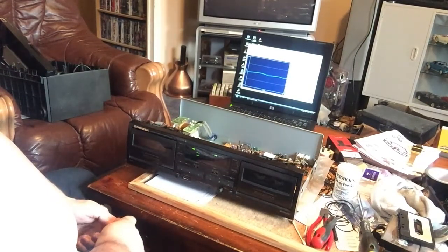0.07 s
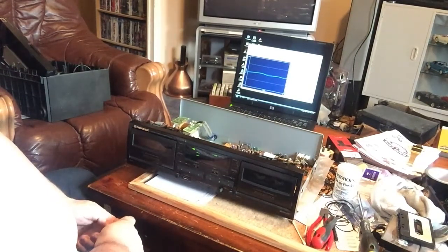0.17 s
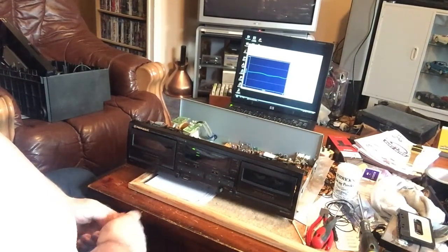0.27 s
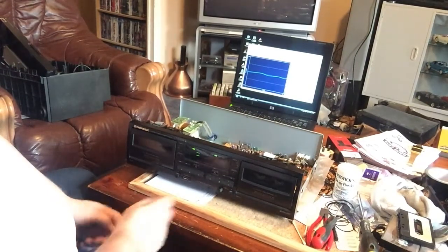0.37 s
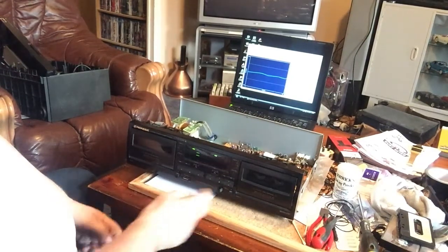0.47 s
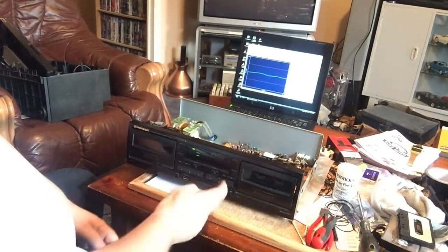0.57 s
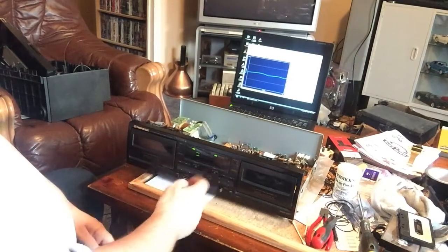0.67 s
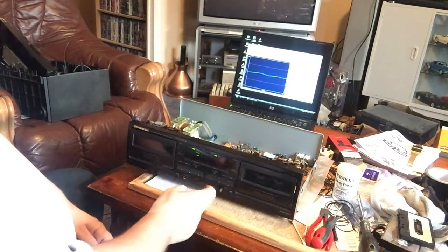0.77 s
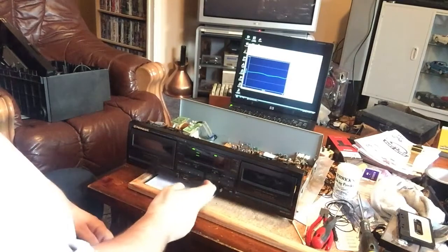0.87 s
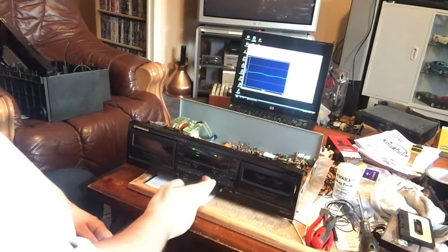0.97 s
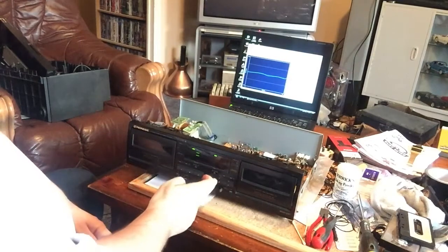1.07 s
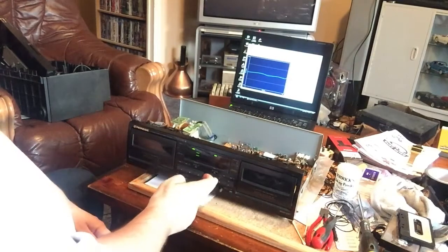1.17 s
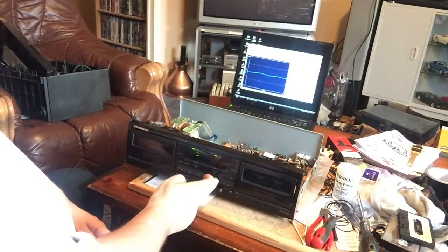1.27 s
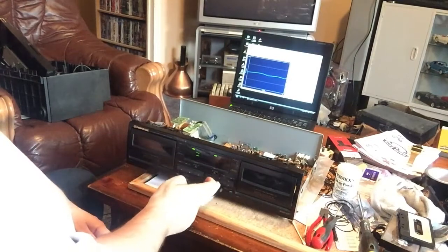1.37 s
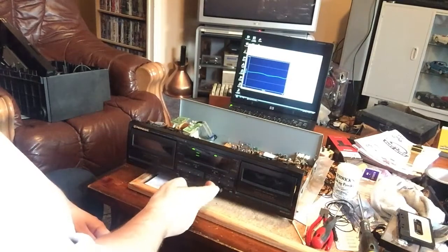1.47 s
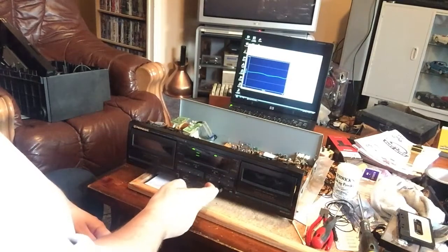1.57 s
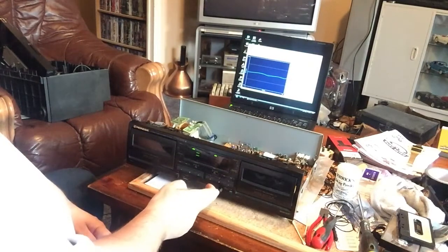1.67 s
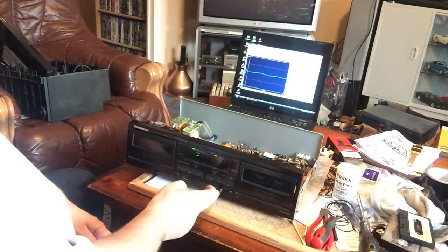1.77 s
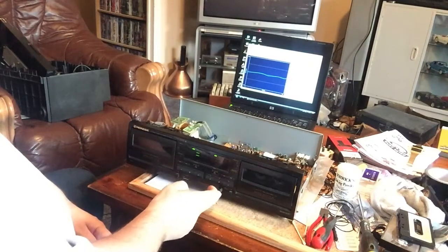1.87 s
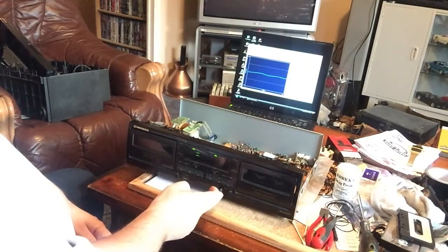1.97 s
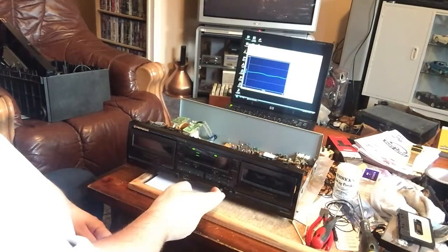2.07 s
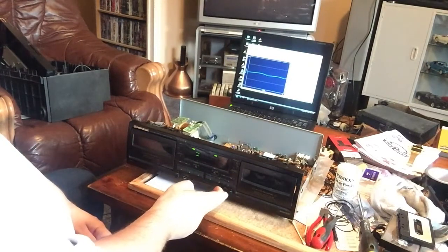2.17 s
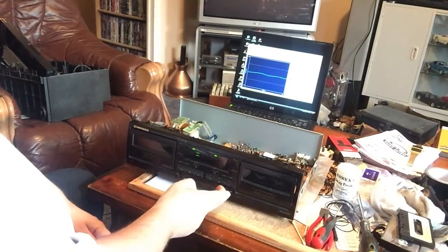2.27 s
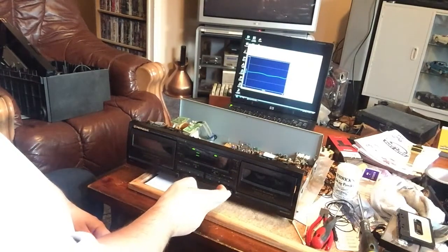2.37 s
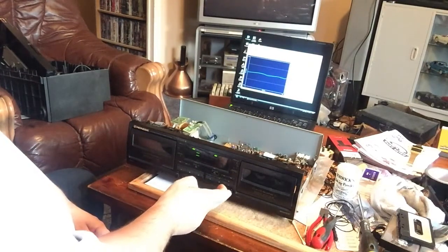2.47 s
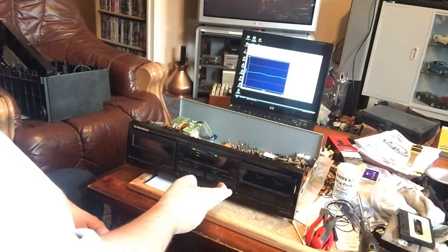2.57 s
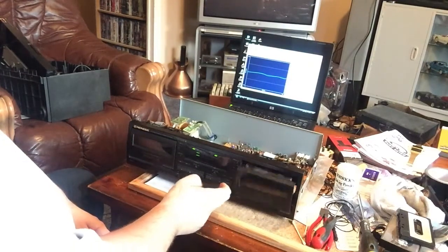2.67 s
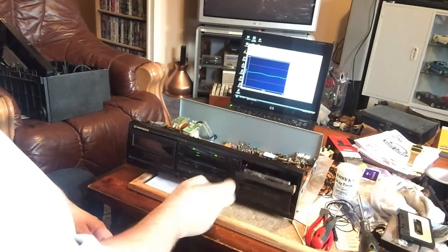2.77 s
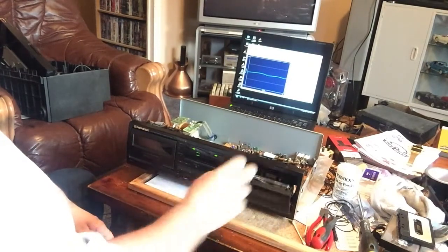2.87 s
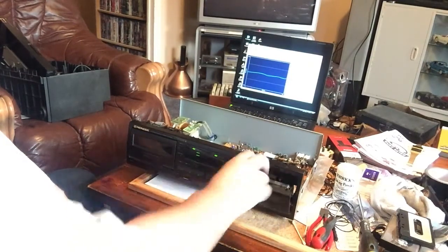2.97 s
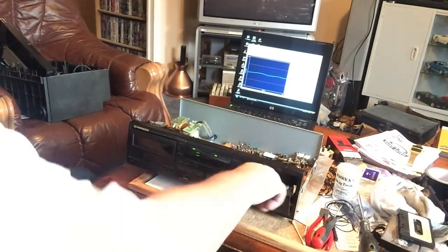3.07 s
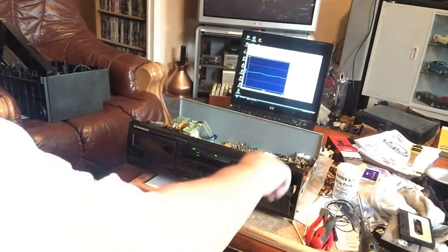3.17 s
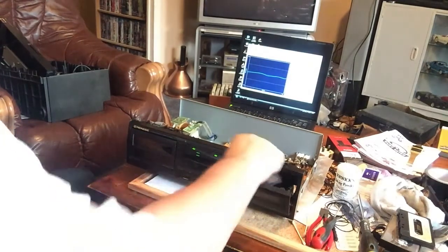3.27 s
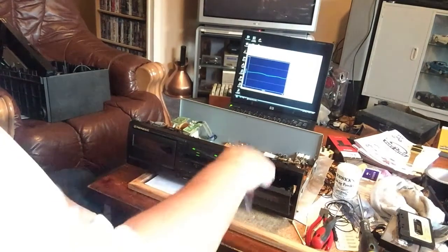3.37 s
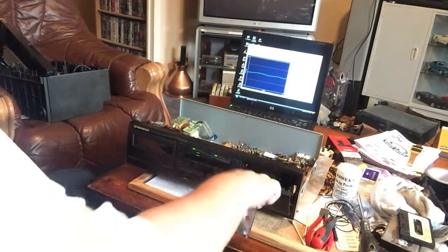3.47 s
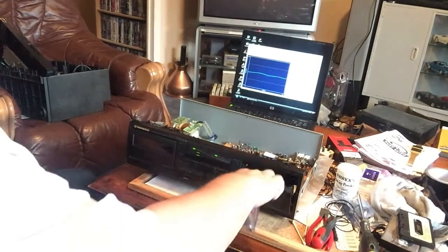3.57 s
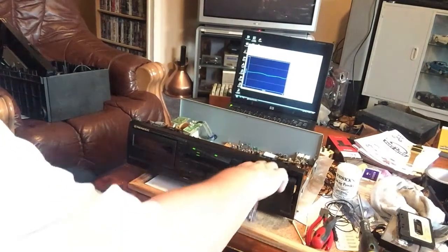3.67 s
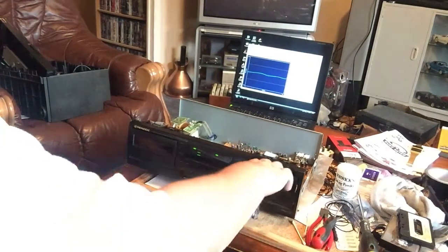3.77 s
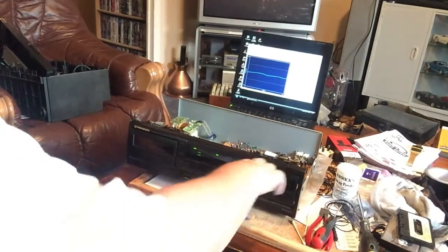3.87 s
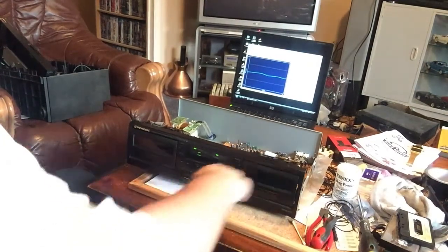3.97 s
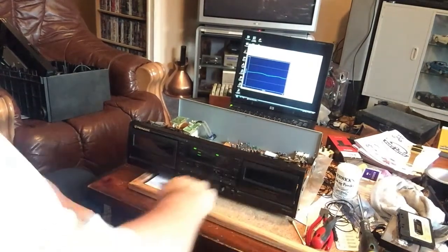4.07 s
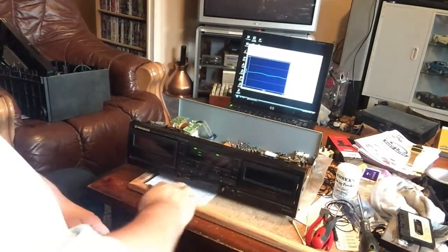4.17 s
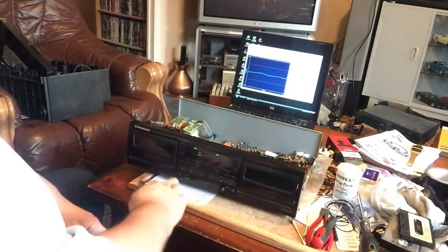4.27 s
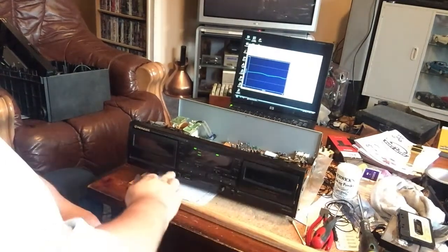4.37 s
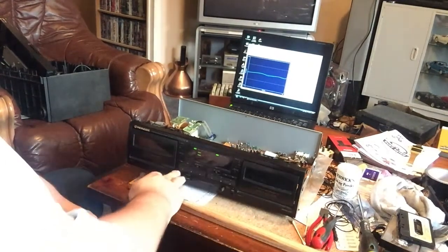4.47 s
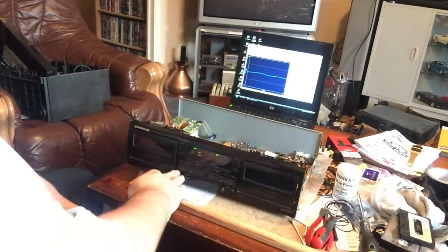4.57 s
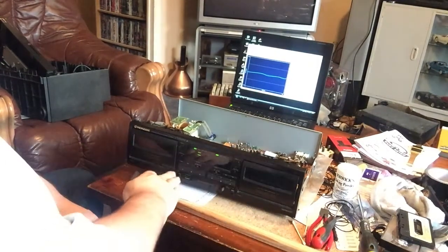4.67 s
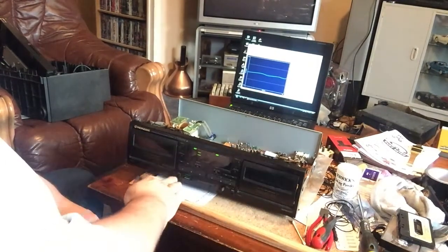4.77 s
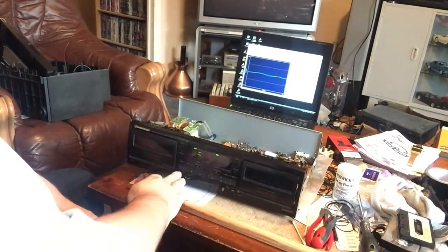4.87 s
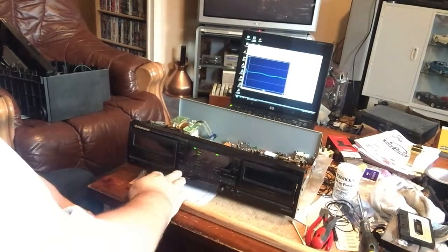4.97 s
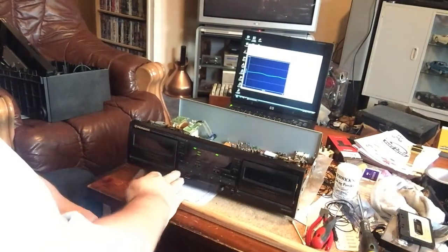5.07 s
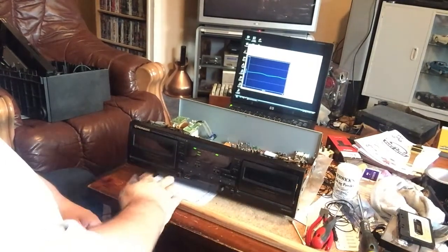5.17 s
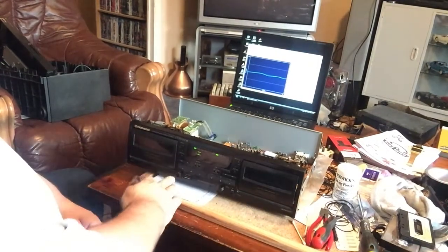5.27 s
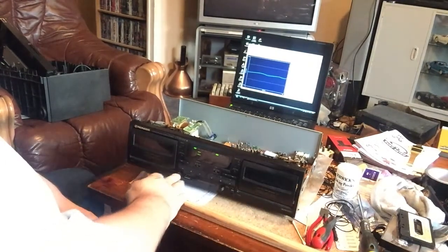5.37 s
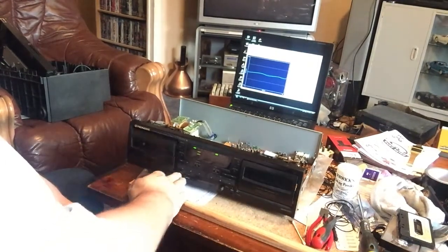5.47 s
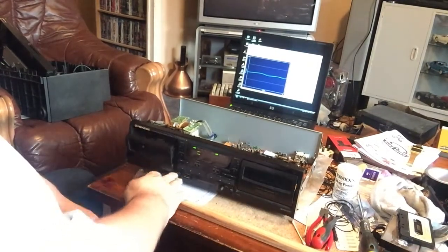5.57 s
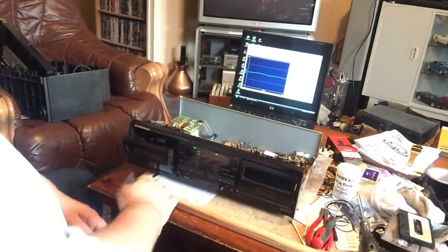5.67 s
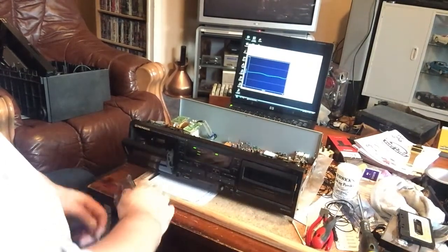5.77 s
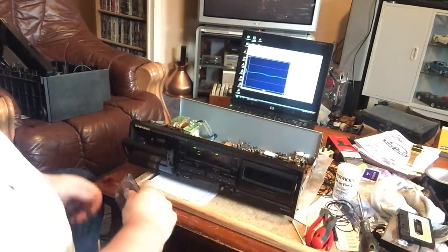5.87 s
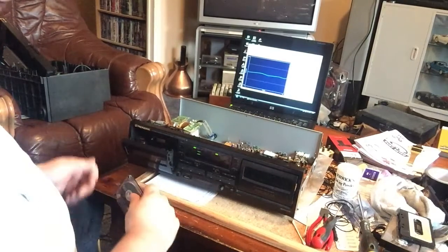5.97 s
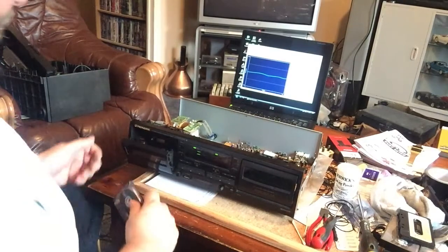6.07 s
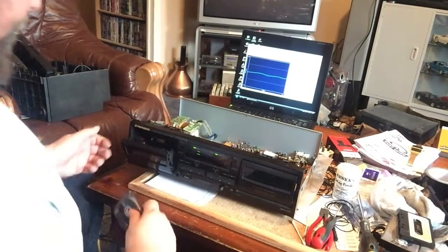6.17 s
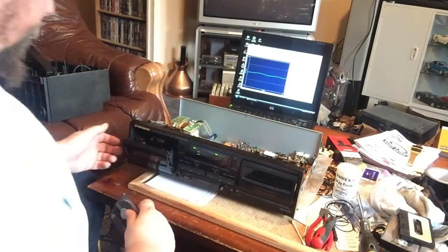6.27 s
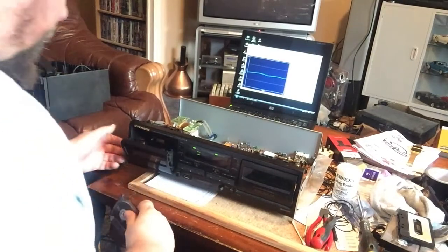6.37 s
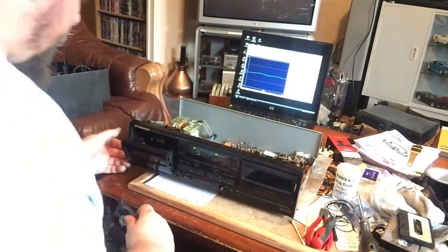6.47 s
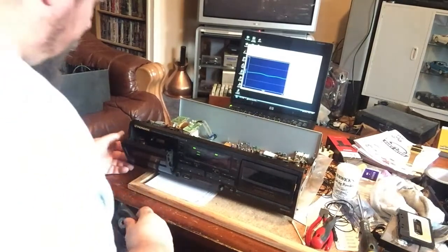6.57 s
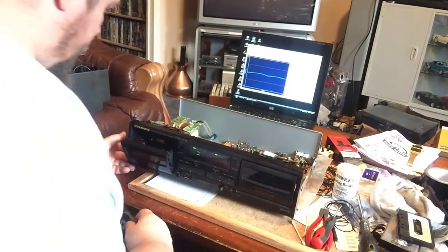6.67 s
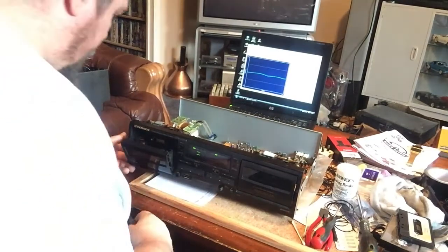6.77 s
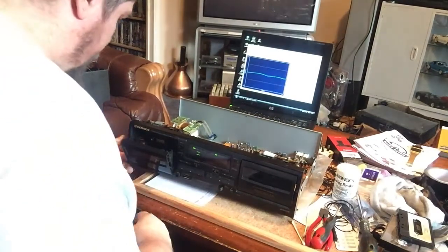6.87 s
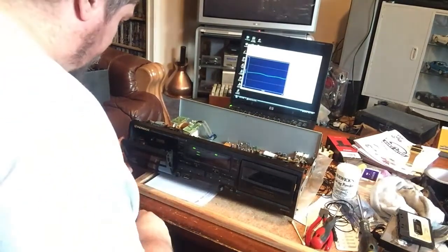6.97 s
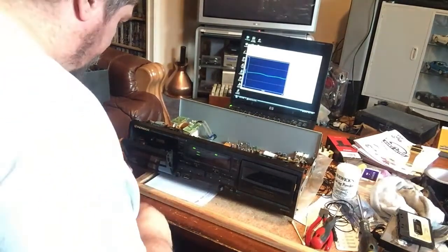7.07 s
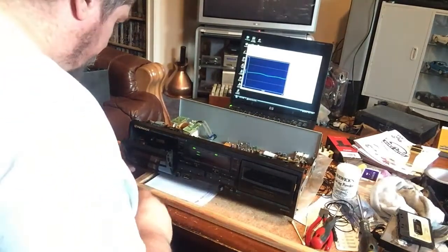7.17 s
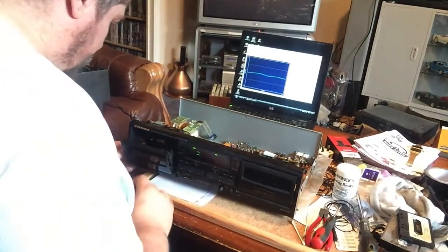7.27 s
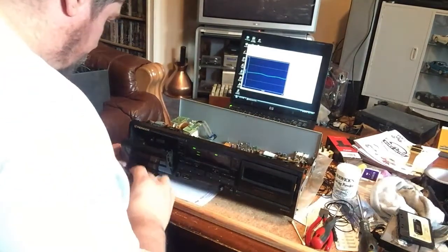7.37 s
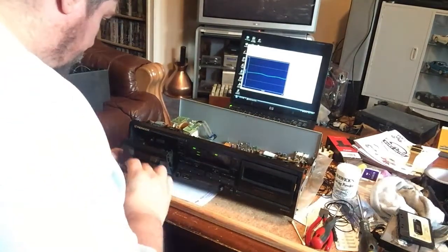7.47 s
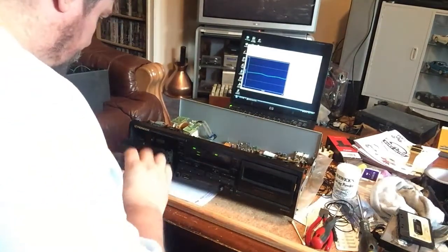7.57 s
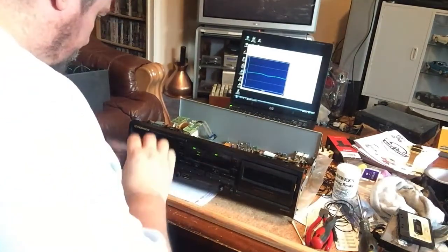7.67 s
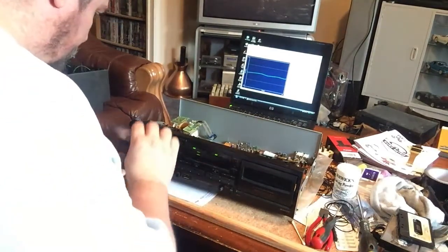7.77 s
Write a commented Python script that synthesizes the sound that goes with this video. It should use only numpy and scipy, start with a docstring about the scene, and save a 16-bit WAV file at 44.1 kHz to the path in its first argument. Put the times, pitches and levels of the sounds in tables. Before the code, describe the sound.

Hard plastic keys and cassette doors of a tape deck click and clack by hand in a furnished room, with brief scrapes and a slam.

```python
"""Tape deck worked by hand

Keys, latches and cassette doors clack: bursts of tiny contacts excite the ringing modes of the case.
A cassette scrapes as random slips feed a moving resonance; sprung levers buzz as narrow noise bands.
The hand bumps the case with damped low thuds; a motor whines as a wavering sine until a key stops it.
A furnished room adds sparse echo tails and steady noise; a limiter ducks after the door slam.
"""
import sys
import numpy as np
from scipy import signal
from scipy.fft import rfft, irfft, next_fast_len
from scipy.io import wavfile
from scipy.ndimage import uniform_filter1d

SR = 44100
rng = np.random.default_rng(int(sys.argv[2]) if len(sys.argv) > 2 else 0)


def store_wav(level_fs):
    """Save 16-bit WAV to argv[1]."""
    pcm = np.round(np.clip(np.atleast_2d(level_fs), -1, 1) * 32767)
    wavfile.write(sys.argv[1], SR, pcm.T.astype(np.int16))


N = 344421

# Blows of keys, latches and doors; the first falls just before the start. Columns: [t/s, blow level/dB,
# strongest ring f/Hz, treble re middle band/dB, bass re middle band/dB,
# build-up time constant/ms (at least 0.2), time to fall 12 dB/ms (at least 0.4)]
CLACKS = [(-0.012, -22.5, 2492, -15.5, -22.5, 1.9, 18), (0.966, -23, 1300, -11, -32, 1.55, 15),
          (0.975, -12, 1145, -10.5, -24, 2.1, 2), (1.03, -21, 1970, -4.5, -13, 15, 11.5),
          (1.039, -22, 2470, -12, -45, 8.5, -1), (1.097, -26.5, 1756, -22, -18.5, 9.9, 14),
          (1.136, -27, 2000, -8.5, -14.5, 6.8, 7.5), (1.538, -55, 2540, -4, -8, 0.74, 3.5),
          (2.529, -47.5, 1300, -28, -20, 0.9, 20), (2.556, -33, 2194, -22.5, -25, 0.33, 7.5),
          (2.663, -33.5, 1110, -15, -9, 3.6, 2), (2.705, -13, 1250, -11.5, -16.5, 1.9, 5.5),
          (2.716, -16, 1500, -12, -22, 4, 20), (2.819, -9, 2033, -8.5, -27, 0.77, 4),
          (3.009, -37.5, 1224, -32.5, -8, 5.5, 10), (3.039, -44, 1760, -4.5, -22, 4.2, 4.5),
          (3.155, -17.5, 1670, -15.5, -18.5, 6.3, 6), (3.224, -31, 1260, -30, -29, 1.3, 0),
          (3.253, -28, 1640, -32, -27, 1.7, 7), (3.264, -26.5, 1186, -16, -26, 0.98, 2),
          (3.295, -15, 2756, -13, -14.5, 1.5, 6.5), (3.341, -20, 3160, 1, -21, 3.3, 6),
          (3.357, -11, 1264, -16, -28, 0.8, 8), (3.384, -19.5, 1635, 7, -16.5, 2.2, 12),
          (3.395, -11.5, 1803, -10.5, -23.5, 8, 4.5), (3.45, -18.5, 1800, -10, -51, 0.74, 6),
          (3.498, -27, 1580, -22, -48, 1.8, 1), (3.544, -31, 1680, -7.5, -29, 11, 13),
          (3.565, -29, 1760, -21, -28, 5.9, 1), (3.655, -29, 1770, -11, -29, 1.1, 3.5),
          (3.669, -22, 3060, -9.5, -18, 0.53, 1), (3.764, -40.5, 2610, -3, -14, 5.5, 2),
          (3.845, -21, 2840, -4.5, -22, 1.7, 1.5), (3.861, -32.5, 2480, -13, -7, 5.8, 0),
          (3.879, 2, 2100, -6.5, -19, 1.66, 8), (4.293, -25, 1567, -12.5, -16, 0.9, 1),
          (4.298, -24, 1680, -11, -9.5, 1.9, 4.5), (4.382, -43.5, 1560, -18, -23.5, 6.3, 7),
          (4.443, -43.5, 1530, -18.5, -6, 2.5, 12), (4.482, -52.5, 1676, 11.5, -11, 6.1, 4),
          (4.604, -19.5, 2880, -12.5, -29, 2.6, 3.5), (4.631, -25.5, 1430, -29, -5.5, 2, 4.5),
          (4.731, -18, 1435, -12.5, -23, 0.97, 10.5), (4.91, -16.5, 1670, -24.5, -12, 0.88, 2),
          (5.014, -24.5, 2560, -15, -15.5, 6.5, 8.5), (5.107, -42, 1166, -23, -6, 11, 4),
          (5.138, -42.5, 1050, -15, -14, 4.6, 19), (5.171, -15, 1107, -10.5, -24, 0.75, 4.5),
          (5.523, -38, 2550, -8, -29.5, 0.65, 5.5), (5.528, -18, 2620, -12, -30, 1.13, 5.5),
          (5.577, -26, 1352, -21, -23.5, 17, 0.5), (5.609, -37, 3000, 3, -29.5, 2.2, 3),
          (5.687, -14.5, 1100, -10.5, -24.5, 1.1, 5), (5.89, -39.5, 1130, -18, -26.5, 2.7, 4),
          (5.901, -37, 1123, -4.5, -19, 1.2, 4.5), (7.29, -53.5, 1870, 3, -12, 4.06, 9.5),
          (7.492, -31.5, 1145, -16, 0, 0.57, 3.5), (7.6, -45.5, 1030, -1, -10, 2.7, 1.5),
          (7.629, -51.5, 1890, -20, -18, 3.1, 11), (7.727, -48, 2280, -18, -11, 0.42, 1)]
# Hand and cassette against table and case: [t/s, thud level/dB, thud f/Hz, knock re thud/dB]
BUMPS = [(3.878, -42, 60, -18), (4.319, -39, 277, -19), (4.454, -43, 560, -10), (4.643, -35.5, 570, -24),
         (4.931, -26, 630, -18), (6.318, -40.5, 296, -4.5), (6.351, -38.5, 258, -9.5),
         (6.609, -54, 140.0, 4), (6.626, -53, 384, -2.5), (6.774, -53, 262, -10), (6.92, -52.5, 246, -13.5),
         (6.949, -48, 222, -9.5), (7.378, -53.5, 270.0, -1), (7.423, -51, 500.0, -3),
         (7.494, -36.5, 250, -24), (7.512, -33, 143, -19)]
# Sliding, chattering parts, one curve for each spell of rubbing, which may hold several strokes:
# [t/s, level/dB, rubbing-spot resonance f/Hz]
SCRAPES = [
    [(0.94, -61, 1190), (0.99, -36, 1390), (1.015, -27, 1150), (1.06, -34, 2680), (1.12, -52, 1690),
     (1.17, -65, 1740), (1.225, -68, 1690)],
    [(3.148, -46, 1601), (3.17, -35, 1630), (3.215, -54, 1600), (3.25, -48, 1500), (3.28, -32.5, 1120),
     (3.325, -31, 1640), (3.375, -39, 1260), (3.405, -24, 1760), (3.445, -40, 1700), (3.48, -43, 1740),
     (3.64, -44, 1920), (3.69, -43, 3100), (3.72, -41.5, 3040), (3.78, -74, 2810)],
    [(4.3, -45.5, 2520), (4.325, -44.5, 2480), (4.4, -58.5, 2470), (4.49, -64.5, 2490)],
    [(4.93, -37, 1590), (4.96, -51, 1580), (5.04, -52, 2870), (5.09, -66, 2060), (5.15, -73, 1210)],
    [(5.54, -31, 2370), (5.565, -44, 1210), (5.6, -36, 1340), (5.67, -49, 1840)],
    [(7.3, -73.5, 1810), (7.45, -59, 1300), (7.48, -51.5, 1100), (7.53, -55.5, 1160), (7.58, -72, 1090)],
]
# Sprung levers: [pluck t/s, damping t/s, f/Hz, resonator width/Hz, level at pluck/dB]
SPRINGS = [(1.17, 1.218, 1714, 90.5, -49), (2.822, 2.989, 3900, 400, -34), (4.297, 4.48, 1605, 60.2, -28.5),
           (4.727, 4.867, 4240, 450, -41), (5.164, 5.315, 4230, 450, -37.5), (5.688, 5.847, 4170, 450, -38)]
# Modes of the case: [f/Hz, relative level/dB]
CASE_MODES = [(1222, -43.5), (1642, -54), (1733, -56.5), (2062, -46), (2428, -53.5), (2616, -65),
              (2907, -56.5), (3171, -52.5), (3768, -60), (4366, -62), (4565, -64)]
# Spectrum of one contact: [f/Hz, relative level per Hz/dB]
TICK_SPECTRUM = [(120, -45), (200, -28.5), (380, -16.5), (520, -20), (760, -11.5), (1230, 3), (1500, 4),
                 (2400, 0), (3100, -5), (3600, -6.5), (4300, -10.5), (4900, -15), (6200, -14.5),
                 (9000, -24), (13200, -28.5), (16000, -34.5)]
# Reverberation time of the room: [f/Hz, time to fall 60 dB/s]
ROOM_T60 = [(150, 0.3), (600, 0.29), (1300, 0.24), (4300, 0.3), (15000, 0.24)]
# Spectrum of the room noise: [f/Hz, relative level per Hz/dB]
AIR_SPECTRUM = [(18, -38.5), (30, -10), (75, -2.5), (227, -13.5), (266, -6.5), (526, -16), (649, -12.5),
                (1390, -14.5), (2350, -14), (2900, -18.5), (6720, -23.5), (10500, -29.5), (12300, -29),
                (16000, -34)]

LEAD = SR // 10  # samples kept ahead of the start
BUILD_UP = 800  # samples before a blow's peak
CASE_T60, SPOT_T60, SPRING_T60 = 0.062, 0.029, 0.4  # s
RING_DB, RING_REF_DB, RING_PER_DB = -3, -17.5, -0.14  # hard blows are more tick, light ones more ring
RING_DB_PER_OCTAVE, RING_REF_HZ = -3, 1640  # small high-pitched parts hardly ring
ROOM_DB, CLACK_ROOM_DB = -0.5, -2.5
ROOM_PER_TREBLE_DB, TREBLE_REF_DB = -0.1271, -14.5  # bright ticks beam forward and feed the room less
SCRAPE_TREBLE_DB = -17.5
AIR_DB = -61
WHINE_HZ, WHINE_DB, WHINE_STOP_S = 1191, -70, 0.99
LIMIT_DB, RECOVER_DB_PER_S = -9, 3
EDGE_HZ = 16400  # upper band limit


def gain_of(db):
    """Level to amplitude: 20 dB is a factor of ten."""
    return 10 ** (np.asarray(db) / 20)


def evened(x):
    """Normalisation to unit rms."""
    return x / np.sqrt(np.mean(x ** 2) + 1e-20)


def read(points, hz):
    """Linear interpolation on a logarithmic frequency axis."""
    f, value = np.transpose(points)
    return np.interp(np.log(hz + 1), np.log(f + 1), value)


def add(mix, s, sound):
    """Superposition: a sound is summed into the mix at s seconds."""
    part = mix[LEAD + round(s * SR):][:len(sound)]
    part += sound[:len(part)]


def peaked(x, db):
    """Short-time level: the rms of the loudest two milliseconds is set to db."""
    return gain_of(db) * x / np.sqrt(uniform_filter1d(x ** 2, size=88).max())


def causal(db):
    """Minimum phase: the Hilbert transform of the log gain gives a response without pre-ringing."""
    log = np.log(gain_of(np.maximum(db, -100)))
    log = np.r_[log, log[-2:0:-1]]
    spectrum = np.exp(np.conj(signal.hilbert(log)))
    return np.fft.ifft(spectrum).real[:len(db)]


def rattle(rise_ms, fall_ms, size=3000):
    """Random impacts: uneven contacts swell up to the blow and decay exponentially after it."""
    ms = (np.arange(size) - BUILD_UP) / SR * 1000
    u, sign, strength = rng.random(size), rng.choice([-1., 1.], size), rng.exponential(1, size)
    contacts = (u < .25) * sign * gain_of(3.1 * np.minimum(strength, 4))
    rise_ms, fall_ms = max(rise_ms, .2), max(fall_ms, .4)
    rise = np.exp(ms / rise_ms) * (ms > -2.2 * rise_ms)
    fall = gain_of(-12 * ms / fall_ms)
    return contacts * np.where(ms < 0, rise, fall)


def case_ring(centre_hz):
    """Modal superposition: modes near the struck spot answer most, a little differently at every blow."""
    hz, db = np.transpose(CASE_MODES)[:, :, None]
    t = np.arange(4000) / SR
    level_chance, pitch_chance = rng.standard_normal((2, len(hz), 1))
    near_db = -11 * np.log2(hz / centre_hz) ** 2 + 9.2 * level_chance
    decay = gain_of(db + near_db - 60 * t / CASE_T60)
    modes = (decay * np.sin(2 * np.pi * hz * (1 + 0.023 * pitch_chance) * t)).sum(0)
    spot = gain_of(-60 * t / SPOT_T60) * np.sin(2 * np.pi * centre_hz * t)
    ring = modes / np.linalg.norm(modes) + 1.5 * spot / np.linalg.norm(spot)
    return ring / np.linalg.norm(ring)


def struck(centre_hz, ring_db):
    """Impulse response: the deck answers one contact with a tick and the ringing case."""
    tick = causal(read(TICK_SPECTRUM, np.fft.rfftfreq(2048, 1 / SR)))
    body = gain_of(ring_db) * case_ring(centre_hz)
    body[:len(tick)] += 0.56 * tick / np.linalg.norm(tick)
    return body


def balanced(x, treble_db, bass_db):
    """Band energies: treble and the band below 800 Hz are set relative to the band between."""
    size = next_fast_len(len(x) + 500)
    hz, z = np.fft.rfftfreq(size, 1 / SR), rfft(x, size)
    low = 1 / (1 + (hz / 800) ** 8)
    high = 1 / (1 + (4400 / (hz + 1)) ** 6)
    mid = 1 - low - high
    low = low / (1 + (210 / (hz + 1)) ** 4)  # the small case radiates no deep bass
    low_to_mid, high_to_mid = [np.linalg.norm(z * mid) / np.linalg.norm(z * band) for band in (low, high)]
    bass = low * low_to_mid * gain_of(bass_db)
    treble = high * high_to_mid * gain_of(treble_db)
    return irfft(z * (mid + bass + treble), size)


def clack(blow_db, centre_hz, treble_db, bass_db, rise_ms, fall_ms):
    """Convolution: a rattle heard through the deck; the walls get a flatter blend of the response."""
    hardness_db = RING_PER_DB * (blow_db - RING_REF_DB)
    pitch_db = RING_DB_PER_OCTAVE * np.log2(centre_hz / RING_REF_HZ)
    ring_db = RING_DB + hardness_db + pitch_db
    room_db = CLACK_ROOM_DB + ROOM_PER_TREBLE_DB * (treble_db - TREBLE_REF_DB)
    sound = signal.fftconvolve(rattle(rise_ms, fall_ms), struck(centre_hz, ring_db))
    sound = peaked(balanced(sound, treble_db, bass_db), blow_db)
    # the walls are struck from all sides
    blend = np.pad(struck(centre_hz, ring_db - 6.5), (BUILD_UP, 0))
    blend = balanced(blend, treble_db, bass_db)
    return sound, gain_of(room_db) * blend * np.linalg.norm(sound) / np.linalg.norm(blend)


def room(x):
    """Reverberation: three sparse tails, each band with its own decay, take turns so like hits differ."""
    out, turn = np.zeros(len(x)), np.arange(len(x)) / SR * 2.3
    for k in range(3):
        taps = np.zeros(SR // 2)
        at = np.arange(200, len(taps) - 20, 20)
        taps[at + rng.integers(0, 20, len(at))] = rng.choice([-1., 1.], len(at))
        clumps = evened(uniform_filter1d(rng.standard_normal(len(taps)), size=150))
        taps *= gain_of(2.8 * clumps)
        hz, t, z = signal.stft(taps, SR, nperseg=256)
        decay = gain_of(-60 * t / read(ROOM_T60, hz)[:, None])
        tail = signal.istft(z * decay, SR, nperseg=256)[1]
        share = np.sqrt(2 / 3) * np.cos(np.pi * (turn + k / 3))  # the squared shares sum to 1
        out += signal.fftconvolve(x * share, tail / np.linalg.norm(tail))[:len(x)]
    return out


def air():
    """Filtered noise: steady room noise with faint patches drifting over time and frequency."""
    frames, hz = N // 256 + 5, np.fft.rfftfreq(1024, 1 / SR)
    a, b, patches = rng.standard_normal((frames, 513, 3)).T
    patches = uniform_filter1d(patches, size=10, axis=0)
    patches = evened(uniform_filter1d(patches, size=14, axis=1))
    z = (a + 1j * b) * gain_of(read(AIR_SPECTRUM, hz)[:, None] + 1.9 * patches)
    noise = signal.istft(z, nperseg=1024, noverlap=768)[1][:N]
    return gain_of(AIR_DB) * evened(noise)


def whine():
    """Frequency modulation: a thin motor tone wavers by 4 Hz rms until it stops."""
    t = np.arange(N) / SR
    hz = WHINE_HZ + 4 * evened(uniform_filter1d(rng.standard_normal(N), size=2000))
    tone = np.sqrt(2) * np.sin(2 * np.pi * np.cumsum(hz) / SR)
    return gain_of(WHINE_DB) * tone * (t < WHINE_STOP_S)


def scrape(rows):
    """Stick-slip friction: dense uneven slips feed the deck and a resonance moving with the rubbing spot."""
    s, *columns = np.transpose(rows)
    t = np.arange(s[0], s[-1], 1 / SR)
    level_db, centre_hz = (np.interp(t, s, c) for c in columns)
    slips = (rng.random(len(t)) < 1500 / SR) * rng.standard_normal(len(t))  # 1500 slips a second
    slips = slips * gain_of(3.5 * evened(uniform_filter1d(rng.standard_normal(len(t)), size=200)))
    # shift the spot to 0 Hz, filter with a one-pole resonance 130 Hz wide, shift back
    turn, r = np.exp(2j * np.pi * np.cumsum(centre_hz) / SR), np.exp(-np.pi * 130 / SR)
    spot = (turn * signal.lfilter([1 - r], [1, -r], slips / turn)).real
    sound = balanced(signal.fftconvolve(slips, struck(1900, 6.0)), 0, -12.5)[:len(t)]
    low = signal.sosfiltfilt(signal.butter(N=4, Wn=5000, fs=SR, output="sos"), sound)
    body = evened(evened(low) + 2.2 * evened(spot))
    sound = body + evened(sound - low) * gain_of(SCRAPE_TREBLE_DB)
    return s[0], sound * gain_of(level_db) * signal.windows.tukey(len(t), .06)


def spring(start, stop, hz, width_hz, level_db):
    """Randomly driven resonance: one mode buzzes with chatter and dies slowly until it is damped."""
    t, r = np.arange(0, stop - start, 1 / SR), np.exp(-np.pi * width_hz / SR)
    chatter = signal.lfilter([1], [1, -2 * r, r ** 2], rng.standard_normal((2, SR // 4)))[:, :len(t)]
    tone = evened(chatter[0] * np.sin(2 * np.pi * hz * t) + chatter[1] * np.cos(2 * np.pi * hz * t))
    return tone * gain_of(level_db - 60 * t / SPRING_T60) * signal.windows.tukey(len(t), .2)


def bump(blow_db, thud_hz, knock_db):
    """Heavy damping: a soft push gives a low thud, 60 dB down in about 3 cycles, and a dull knock."""
    t, push = np.arange(2000) / SR, rattle(3.5, 11.5)
    thud = t * np.sin(2 * np.pi * thud_hz * t) * gain_of(-60 * t * thud_hz / 3.1)
    thud, knock = (signal.fftconvolve(push, body)[:4500] for body in (thud, struck(1300, -5.0)))
    knock = signal.sosfilt(signal.butter(N=2, Wn=2300, fs=SR, output="sos"), knock)
    return peaked(thud, blow_db) + peaked(knock, blow_db + knock_db)


def scene():
    """Superposition of direct sound, its room tail, the room noise and the motor."""
    deck, spread = np.zeros((2, N + LEAD))  # direct sound, and what feeds the room
    for s, *row in CLACKS:
        sound, blend = clack(*row)
        add(deck, s - BUILD_UP / SR, sound)
        add(spread, s - BUILD_UP / SR, blend)
    for rows in SCRAPES:
        s, sound = scrape(rows)
        add(deck, s, sound)
        add(spread, s, gain_of(-12.0) * sound)
    for row in SPRINGS:
        sound = spring(*row)
        add(deck, row[0], sound)
        add(spread, row[0], gain_of(-18.0) * sound)
    for s, *row in BUMPS:
        sound = bump(*row)
        add(deck, s - BUILD_UP / SR, sound)
        add(spread, s - BUILD_UP / SR, gain_of(-10.0) * sound)
    deck = deck + gain_of(ROOM_DB) * room(spread)
    return (deck[LEAD:] + air() + whine())[None]


def record(dry):
    """Gain control: deep bass is cut, overload ducks fast and recovers slowly, peaks round, treble ends."""
    dry = signal.sosfilt(signal.butter(N=2, Wn=42, btype="high", fs=SR, output="sos"), dry)
    power_db = 10 * np.log10(abs(uniform_filter1d(dry[0] ** 2, size=200)) + 1e-12)
    fall = np.arange(N) * RECOVER_DB_PER_S / SR
    held_db = np.maximum.accumulate(power_db + fall) - fall  # peaks held, sinking at the recovery rate
    over_db = np.maximum(held_db - LIMIT_DB, 0)
    ducked = dry / gain_of(uniform_filter1d(over_db, size=100))
    rounded = .85 * np.tanh(ducked / .85)
    band_limit = signal.firwin(511, EDGE_HZ, window=("kaiser", 9), fs=SR)
    return signal.oaconvolve(rounded, band_limit[None], "same")


dry = scene()
out = record(dry)
store_wav(out)
```